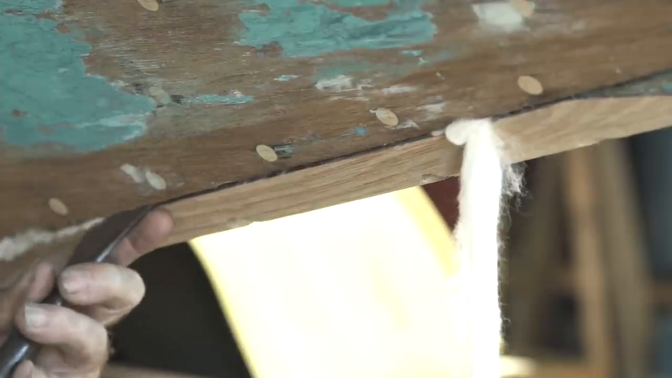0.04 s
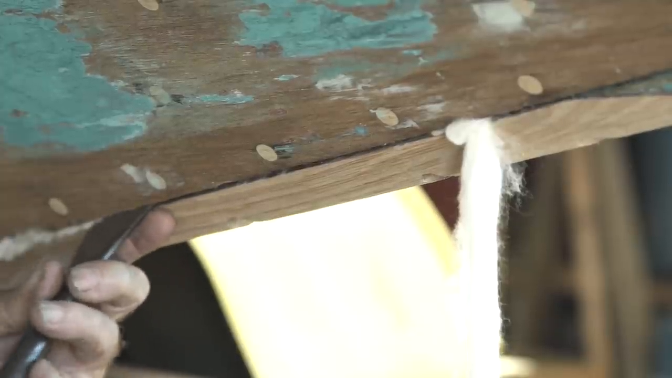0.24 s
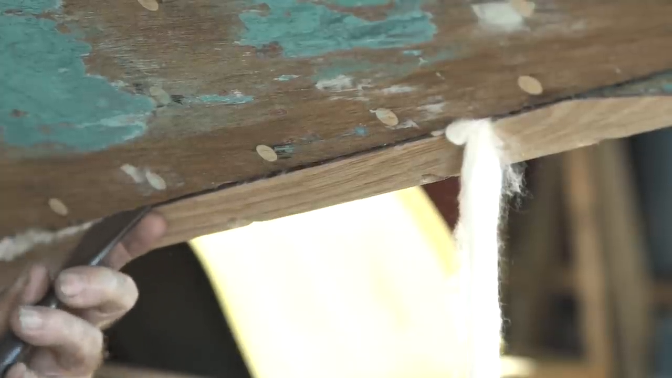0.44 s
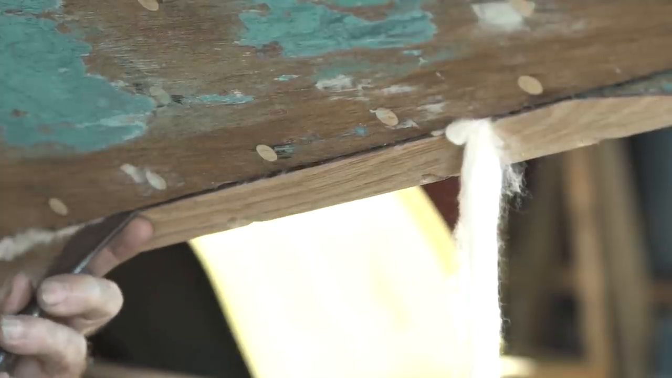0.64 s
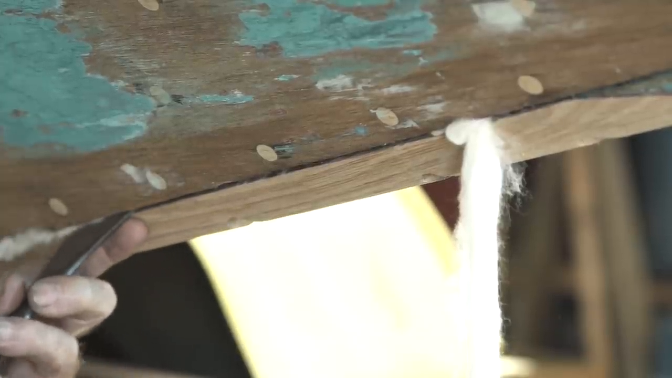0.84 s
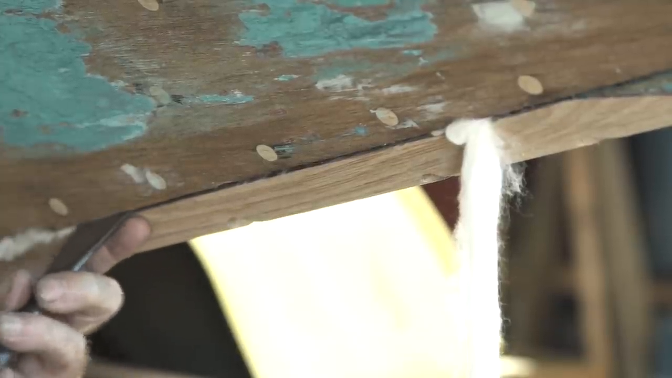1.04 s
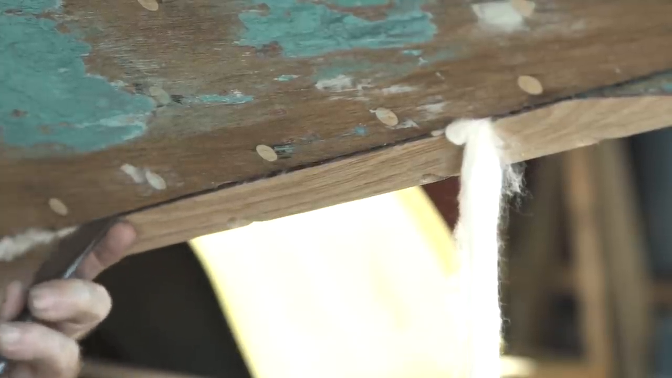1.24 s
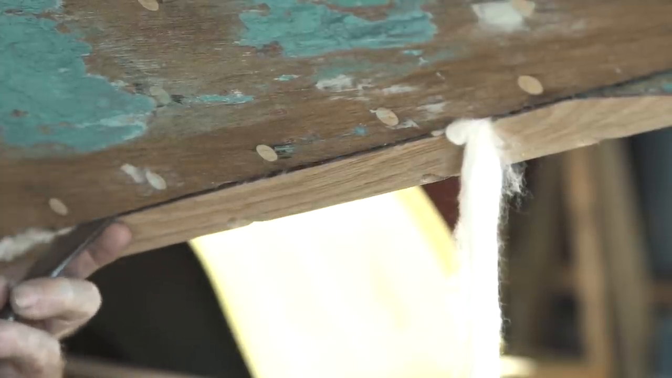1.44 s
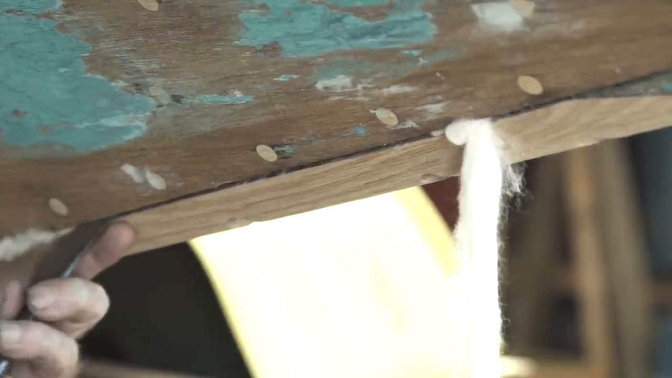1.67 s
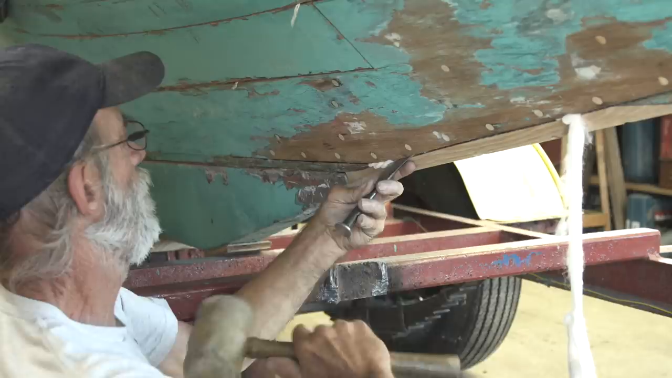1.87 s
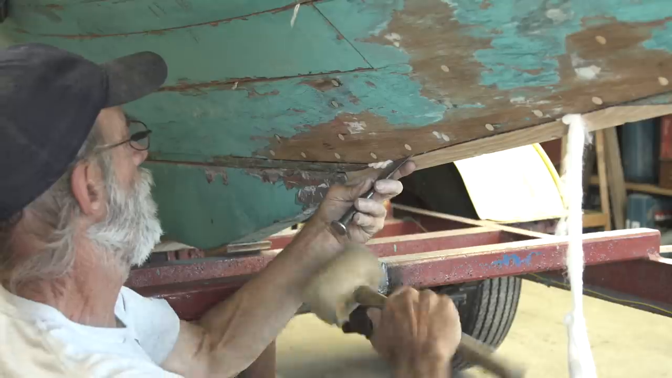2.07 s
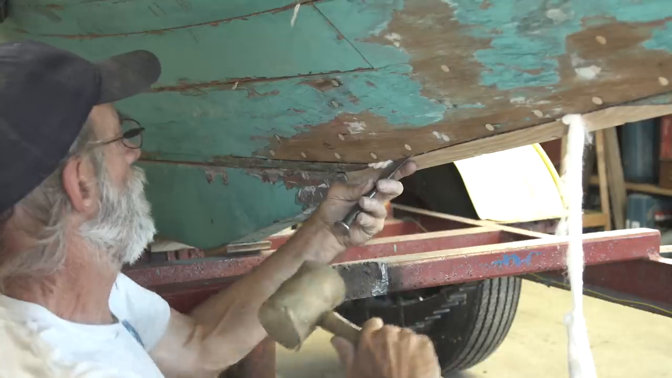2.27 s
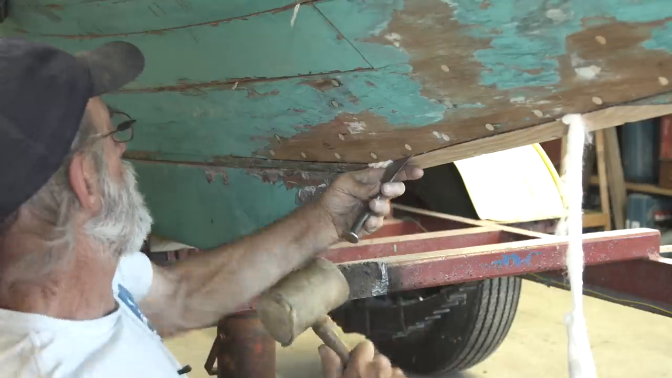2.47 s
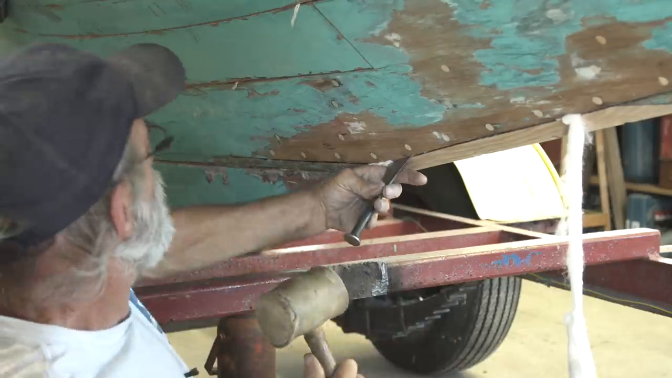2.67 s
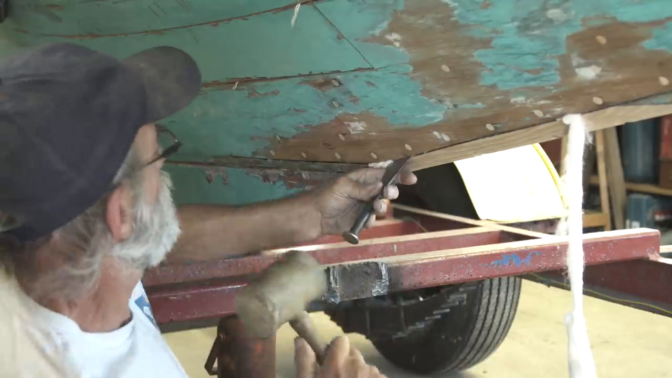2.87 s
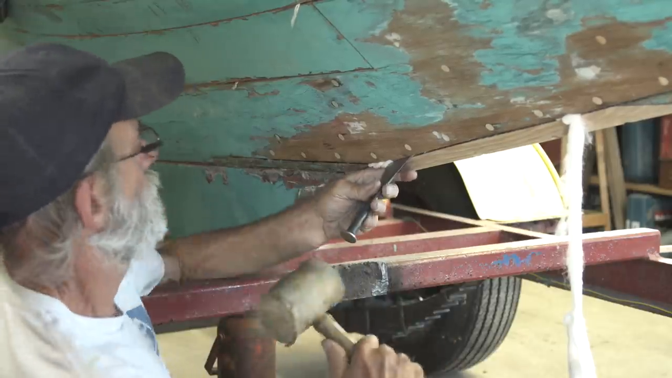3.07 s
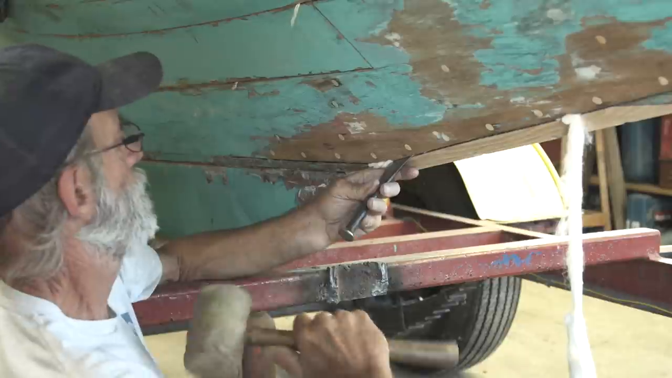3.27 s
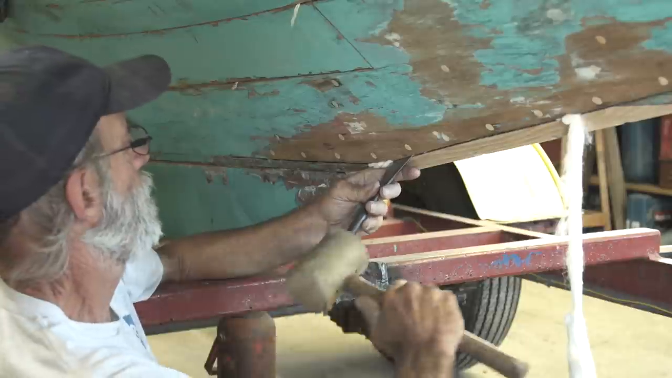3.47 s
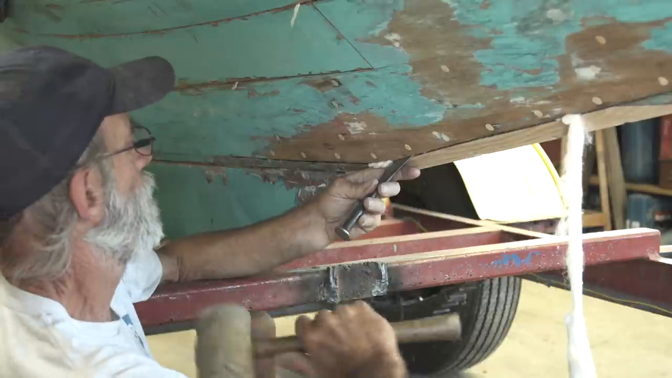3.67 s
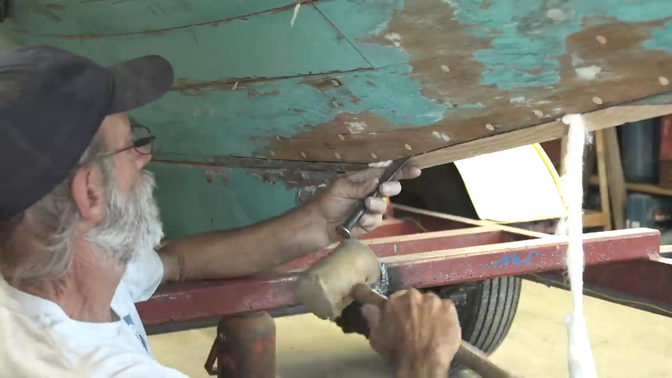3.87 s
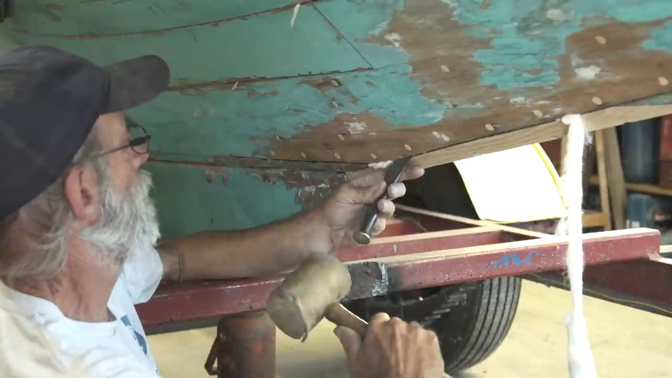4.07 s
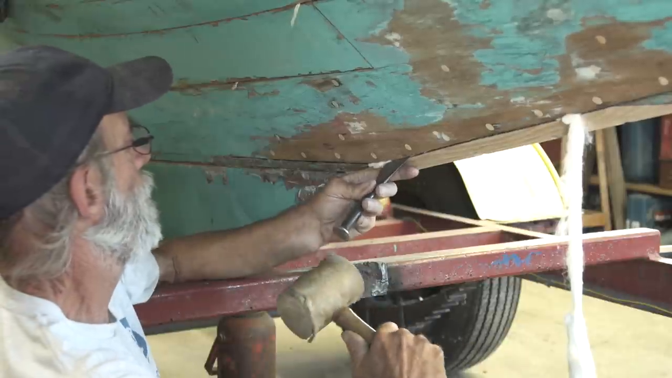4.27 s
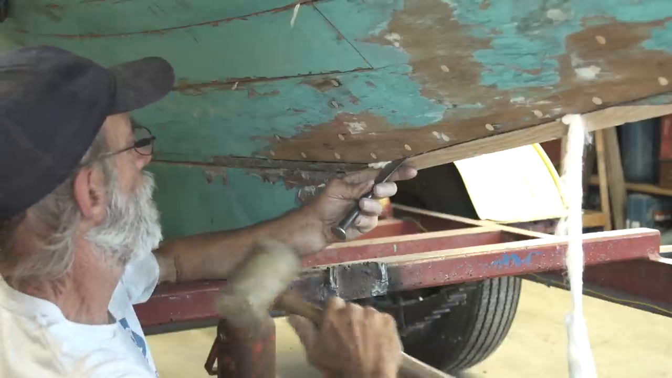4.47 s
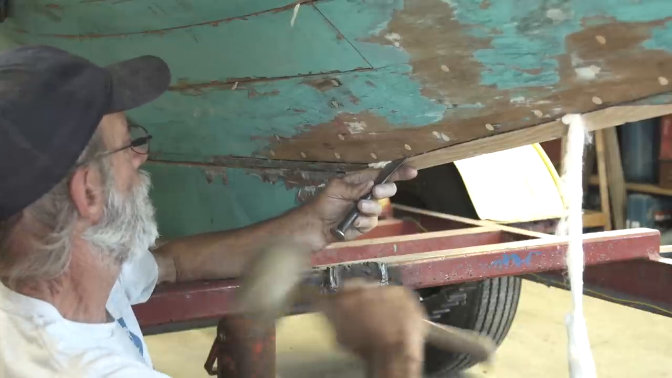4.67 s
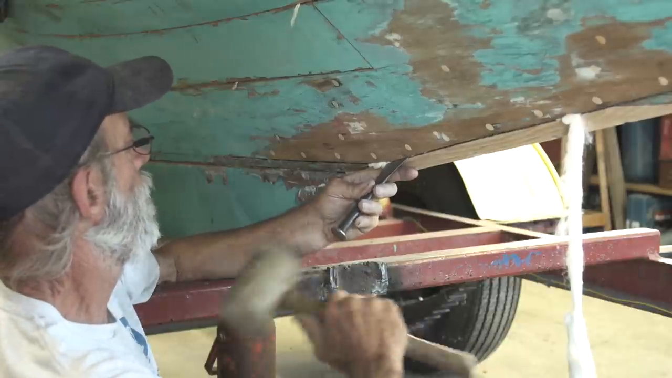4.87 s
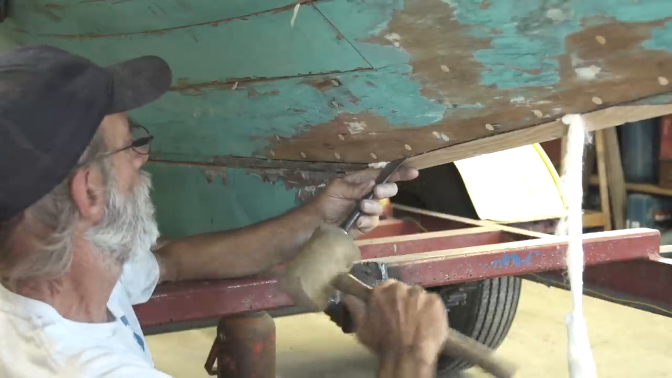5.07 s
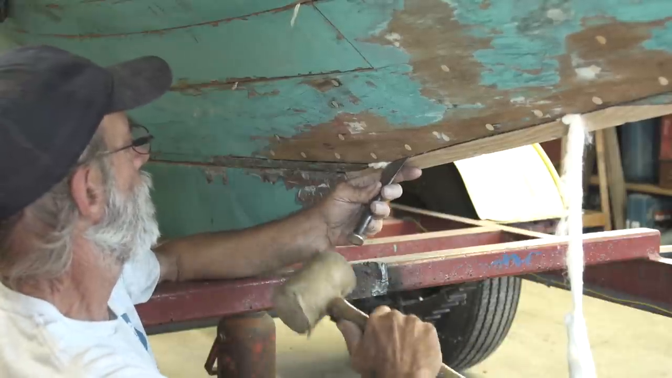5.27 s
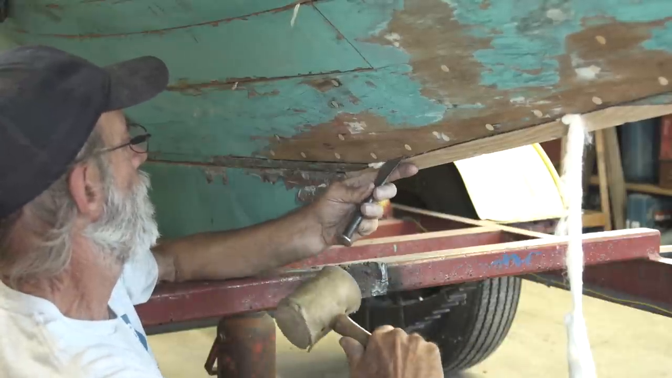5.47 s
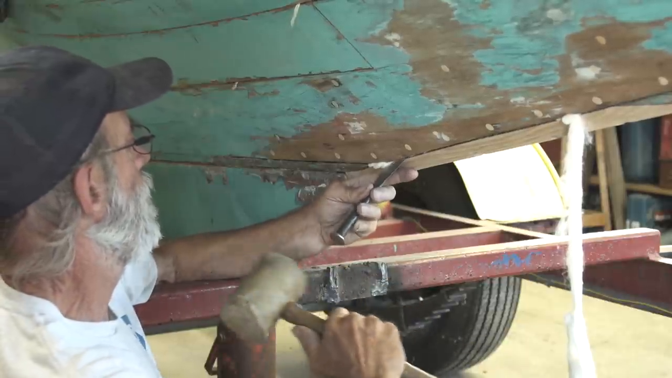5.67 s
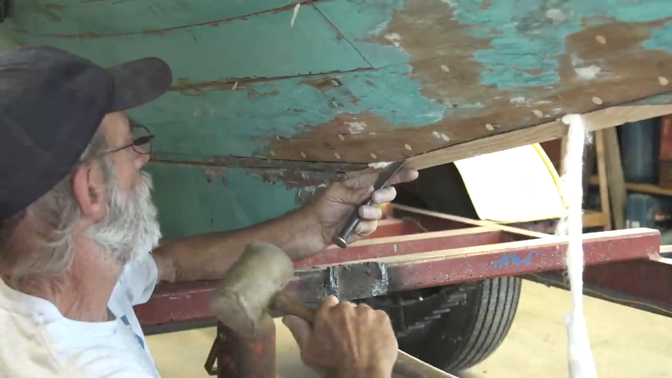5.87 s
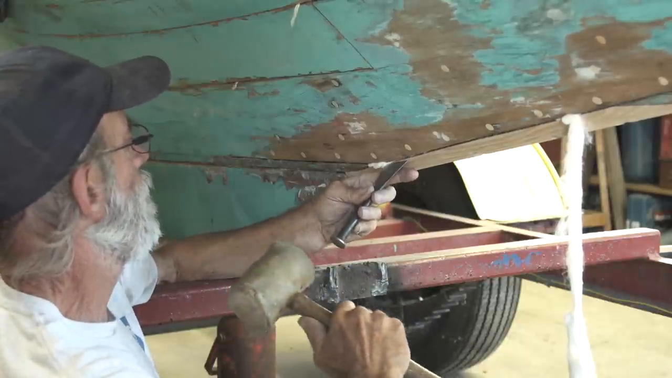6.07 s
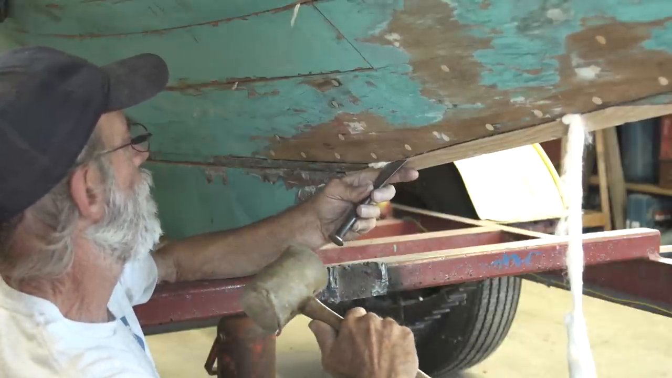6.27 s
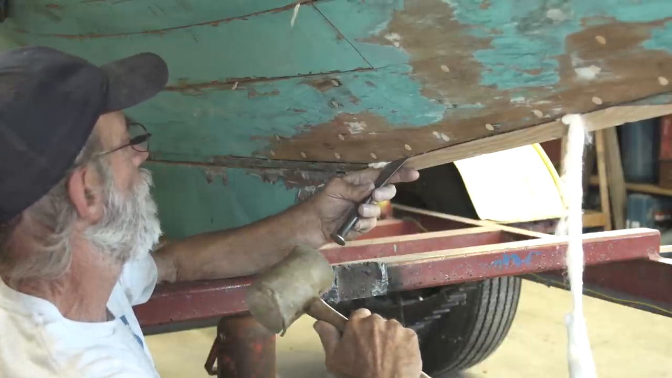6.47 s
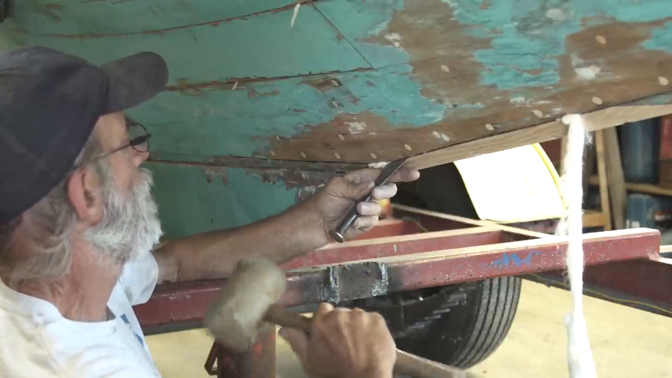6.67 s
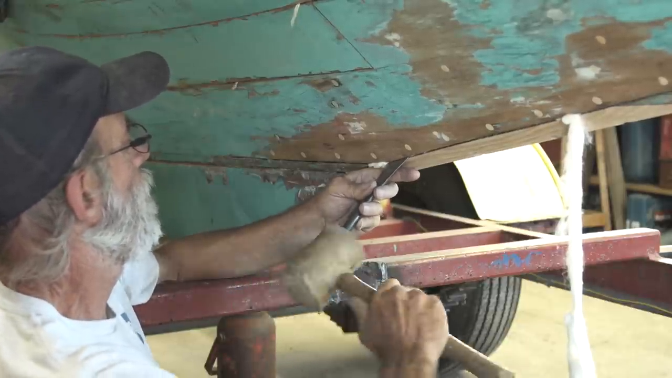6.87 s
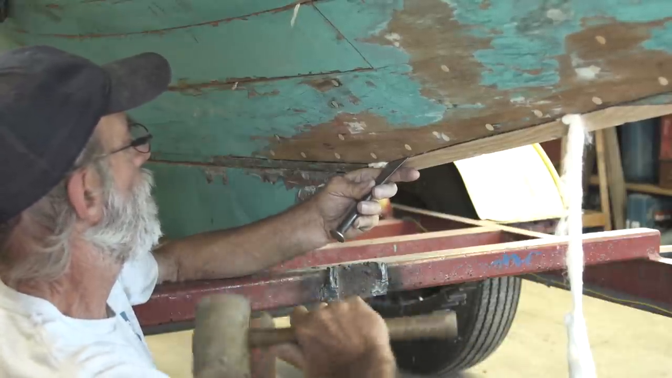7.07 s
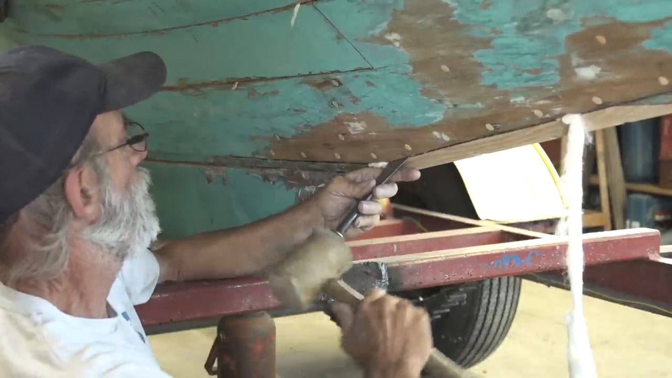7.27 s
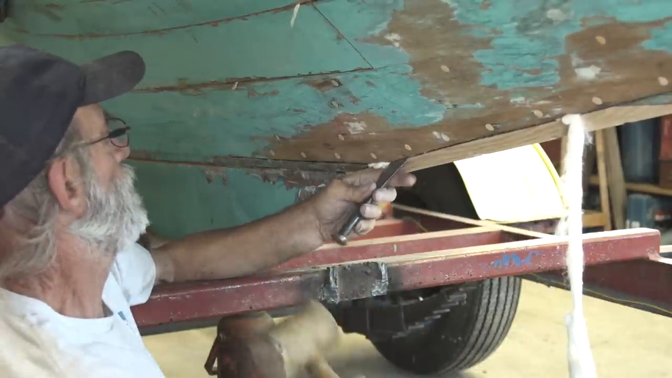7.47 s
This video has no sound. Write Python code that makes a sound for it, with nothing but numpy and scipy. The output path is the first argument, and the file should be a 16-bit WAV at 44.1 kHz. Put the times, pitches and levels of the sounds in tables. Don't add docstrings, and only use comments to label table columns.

```python
import sys
import numpy as np
from scipy import signal
from scipy.fft import rfft, irfft, next_fast_len
from scipy.io import wavfile
from scipy.ndimage import uniform_filter1d

SR = 44100
rng = np.random.default_rng(int(sys.argv[2]) if len(sys.argv) > 2 else 0)


def generate_wav(signal):
    frames = np.transpose(np.atleast_2d(signal))
    scaled = np.clip(frames, -1, 1) * 32767
    pcm = np.round(scaled).astype(np.int16)
    wavfile.write(sys.argv[1], SR, pcm)


def linear_from_db(decibels):
    return 10 ** (np.asarray(decibels, float) / 20)


N = 331191
CUT_S = 1.945

# pitch_hz, level_db, t60_s
HULL_MODES = [(61.15, -11, 0.05), (86.7, -1.5, .2), (115.3, -15, 0.51), (130.4, -4, 0.19), (180, -5, 0.33),
              (224.2, -9, 0.54), (259.7, 0, 0.21), (327, -9, 0.41)]


def evened(x):
    return x / np.sqrt(np.mean(x ** 2) + 1e-20)


def read(points, hz):
    f, value = np.transpose(points)
    return np.interp(np.log(hz + 1), np.log(f + 1), value)


def add(mix, start_s, sound):
    at = round(start_s * SR)
    sound = sound[max(-at, 0):]
    part = mix[max(at, 0):][:len(sound)]
    part += sound[:len(part)]


def noise(spectrum, size):
    hz = np.fft.rfftfreq(size, 1 / SR)
    return evened(irfft(rfft(rng.standard_normal(size)) * linear_from_db(read(spectrum, hz)), size))


def resonate(x, hz, width_hz):
    turn = np.exp(2j * np.pi * hz * np.arange(len(x)) / SR)
    r = np.exp(-np.pi * width_hz / SR)
    return 2 * (turn * signal.lfilter([1 - r], [1, -r], x / turn)).real


def ring(modes, t, rise_s, spread_db):
    total = 0
    for hz, db, t60 in modes:
        level_luck, pitch_luck = rng.uniform(-1, 1, 2)
        fall = linear_from_db(db + spread_db * level_luck - 60 * t / t60)
        total = total + fall * np.sin(2 * np.pi * hz * (1 + 0.016 * pitch_luck) * t)
    return total * (1 - np.exp(-(t / rise_s) ** 2))


def colour_of(x, size):
    power = abs(rfft(x, 4096)) ** 2
    return np.sqrt(abs(uniform_filter1d(power, size)))[::8]


def tail_colour(s, square, knock):
    # pitch_hz, level_db
    wall_crack = [(300, -22.5), (1000, 9.5), (2000, 2.5), (2700, 0.5), (3700, -5), (5100, -4), (6400, -12),
                  (10000, -14.5), (13000, -21.5), (16000, -26.5)]
    # pitch_hz, glancing_db, square_db
    seating = [(267, -14.5, 11.5), (347, -8, 7.5), (640, 4.5, -10.5), (880, 1.5, -1.5), (1250, -5.5, 1.5),
               (3070, 3, 2.5), (5300, 0.5, 0)]
    # pitch_hz, level_db
    close_seam = [(420, 0), (720, 2), (1550, 5), (2200, 4), (2850, 3), (3500, -0.5)]
    # blow_s, pitch_hz, level_db
    loose_iron = [
        (1.04, 7850, 2.5),
        (1.544, 4240, 4),
        (2.126, 5600, 0.5),
        (2.126, 9000, -3),
        (4.792, 5100, 1),
        (7.261, 7230, 9),
        (7.261, 10500, 3.5),
        (1.544, 2800, 4),
    ]
    hz = np.fft.rfftfreq(512, 1 / SR)
    colour = np.hypot(colour_of(knock, size=17), evened(linear_from_db(read(wall_crack, hz))) * linear_from_db(13.5))

    def bands(rows, width):
        return linear_from_db(sum(db * np.exp(-(np.log((hz + 1) / f) / width) ** 2) for f, db in rows))

    landing = [(f, glancing + (full - glancing) * square) for f, glancing, full in seating]
    colour *= bands(landing + (close_seam if s < CUT_S else []), 0.15)
    colour *= bands([(f, db) for at, f, db in loose_iron if round(at - s, ndigits=1) == 0], 0.09)
    treble_luck = evened(uniform_filter1d(rng.standard_normal(len(hz)), size=4))
    return colour * linear_from_db(1.7 * treble_luck * (hz > 3000))


def blow(s, strength_db, square, plank_db, mallet_db):
    # pitch_hz, level_db
    crack_colour = [(300, -26.5), (1000, -7.5), (2000, 3), (2700, 6.5), (3700, -2.5), (5100, 2),
                    (6200, -7.5), (7700, -3.5), (10000, -17.5), (13000, -29.5), (16000, -37.5)]
    # pitch_hz, level_db, t60_s
    plank_modes = [(125, -9.5, 0.14), (241, -16, 0.083), (480, -6.5, 0.1), (533, 2, 0.035),
                   (677, 6.5, 0.029), (735, -8, 0.044)]
    # pitch_hz, level_db, t60_s
    mallet_modes = [(830, -1.5, 0.043), (1100, -0.5, 0.034), (1224, -3, 0.035), (1500, -3.5, 0.021),
                    (1910, -12, 0.013), (2200, -12, 0.016), (2720, -1.5, 0.01)]
    # pitch_hz, level_db, t60_s
    thud_modes = [(116, 6, 0.077), (90, 0, 0.058)]
    t = np.arange(SR) / SR
    crack = linear_from_db(10.0) * noise(crack_colour, len(t)) * linear_from_db(-60 * t / .022)
    crack *= 1 - np.exp(-(t / 0.0019) ** 2)
    knock = linear_from_db(plank_db - 5) * ring(plank_modes, t, 0.0023, 0.47)
    knock += linear_from_db(mallet_db - 1.5) * ring(mallet_modes, t, 0.0021, 1.5)
    twin = [(1.1 * f, db - 6.5, 0.83 * t60) for f, db, t60 in HULL_MODES]
    glancing_db, square_db = -12, 15.5
    hull_db = glancing_db + (square_db - glancing_db) * square
    boom = linear_from_db(hull_db - 15.0) * ring(HULL_MODES + twin, t, 0.016, 0.93)
    boom += linear_from_db(9.5 * square) * ring(thud_modes, t, 0.018, 0.88)
    heard = shed(s, crack + linear_from_db(-3) * knock, tail_colour(s, square, knock))
    return s - .0013, linear_from_db(strength_db) * (heard + boom)


def mallet_blows(mix):
    # start_s, strength_db, squareness_0_1, plank_db, mallet_db
    earlier_blow = (-.24, -16, .2, 2, -6)
    # start_s, strength_db, squareness_0_1, plank_db, mallet_db
    blow_rows = [
        (0.23, -16.5, 0.66, 5, 0),
        (1.04, -18.5, 0.37, 4.5, -1),
        (1.544, -20.5, 0.53, 6.5, 2.5),
        (2.125, -17, 0.99, 7, 9.5),
        (3.528, -13.5, 0.83, 2.5, 6.5),
        (3.865, -13, 0.95, 5, 5),
        (4.792, -10.5, 0.4, 4, 4.5),
        (5.16, -11.5, 0.93, 2, 2.5),
        (6.938, -12.5, .45, 0, 2),
        (7.261, -11.5, 0.94, 3.5, 2),
    ]
    # start_s, level_db, modes of pitch_hz, level_db, t60_s
    iron_ring = (6.938, -48, [(11770, -3, 0.31), (7100, -6, 0.59), (5100, 2, 0.28)])
    for row in [earlier_blow, *blow_rows]:
        add(mix, *blow(*row))
    s, db, modes = iron_ring
    add(mix, s, linear_from_db(db) * ring(modes, np.arange(SR // 2) / SR, .002, 0))


def tick(s, db, hz, width_hz, t60):
    t = np.arange(8000) / SR
    edges = np.clip([hz - width_hz / 2, hz + width_hz / 2], 300, 15000)
    band = signal.butter(2, edges, "band", fs=SR, output="sos")
    puff = evened(signal.sosfilt(band, rng.standard_normal(len(t))))
    puff *= linear_from_db(db - 60 * t / t60) * (1 - np.exp(-t / 0.00076))
    return s - .001, shed(s, puff, linear_from_db(-18) * colour_of(puff, size=81), size=SR // 3)


def iron_touches(mix):
    # start_s, peak_db, centre_hz
    tick_rows = [(.692, -56.5, 7580), (.832, -77.5, 4500), (.887, -65, 7300), (.897, -67, 6900),
                 (1.782, -61.5, 8060), (2.04, -69.5, 9000), (2.316, -56, 11000), (2.338, -59, 10270),
                 (2.566, -35.5, 5070), (2.66, -59, 12000), (4.155, -64, 11000), (4.369, -42.5, 7760),
                 (4.468, -67.5, 7500), (4.593, -57.5, 3000), (4.687, -76, 7800), (4.703, -61.5, 4080),
                 (4.712, -60.5, 8620), (5.539, -49, 9000), (5.591, -46.5, 4530), (5.652, -63, 9800),
                 (5.91, -72.5, 5000)]
    # start_s, peak_db, centre_hz
    tap_rows = [
        (.691, -61, 1630),
        (.897, -68, 1500),
        (2.566, -44, 1800),
        (4.369, -41.5, 2150),
        (4.593, -58.5, 1500),
        (4.712, -65, 2200),
        (5.539, -48, 1786),
        (5.591, -40.5, 1107),
        (5.652, -61, 1750),
        (5.851, -57, 800),
    ]
    # start_s, peak_db, centre_hz
    drag_rows = [
        (4.375, -71.5, 8300),
        (4.375, -65.5, 2310),
    ]
    for rows, width, t60 in ((tick_rows, 1, 0.0096), (tap_rows, .6, .026), (drag_rows, 0.32, 0.64)):
        for s, db, hz in rows:
            add(mix, *tick(s, db, hz, width * hz, t60))


def bump(s, db, hz, t60, hull_db):
    t = np.arange(SR // 2) / SR
    modes = [(hz, 0, t60), (.62 * hz, -9, t60), (1.6 * hz, -12, t60)]
    push = linear_from_db(db + 3) * ring(modes, t, .8 / hz, 0)
    heard = shed(s, push, linear_from_db(-9) * colour_of(push, size=9), size=len(t))
    return s - .001, heard + linear_from_db(db + hull_db) * ring(HULL_MODES, t, 0.0044, 1.7)


def hull_bumps(mix):
    # start_s, peak_db, pitch_hz, t60_s, hull_answer_db
    bump_rows = [(2.566, -43, 874, 0.02, -33), (2.621, -29.5, 200, .045, -38), (2.648, -47, 103, .6, -24),
                 (3.168, -53, 58.3, 0.089, -28), (5.591, -35, 355, 0.056, -9.5),
                 (5.62, -41, 225, 0.06, -12), (5.65, -42.5, 373, 0.04, -18), (5.682, -49, 397, 0.038, -29),
                 (5.741, -50.5, 352, 0.088, -29), (5.851, -44, 370, 0.042, -8), (6.47, -65, 702, .04, -11)]
    for row in bump_rows:
        add(mix, *bump(*row))


def slide(modes, s, length_s, db):
    size = round(length_s * SR)
    grit = rng.standard_normal(size) * rng.exponential(1, size) * signal.windows.tukey(size, .4)
    grit = np.pad(grit, (0, 4000))
    sung = sum(linear_from_db(level_db) * evened(resonate(grit, f, width)) for f, width, level_db in modes)
    sung = linear_from_db(db) * evened(sung)
    return s, shed(s, sung, linear_from_db(-11.5) * colour_of(sung, size=5), size=SR // 3)


def iron_slides(mix):
    # pitch_hz, width_hz, level_db
    grip_modes = [
        [(4160, 34, 5), (7070, 140, 0.5), (7400, 63, -9.5), (7690, 35, -18), (11700, 39, -9), (13300, 40, -9)],
        [(6040, 29, -2), (7500, 60, -6), (8540, 49, -10), (9490, 60, -10), (10400, 60, -14), (12400, 66, -10)],
        [(2860, 150, -1), (4780, 60, -2.5), (7800, 61, -6.5), (8935, 40, -7), (10920, 45, -6)],
        [(1190, 33, 0)],
        [(4200, 50, 6), (9000, 93, -9)],
    ]
    # start_s, length_s, level_db
    slide_rows = [
        [(5.66, 0.082, -77.5), (5.905, 0.018, -91), (6.34, .025, -99), (6.475, 0.023, -94)],
        [(4.228, .03, -83)],
        [(2.009, .025, -88.5), (2.04, .06, -92)],
        [(0.834, 0.022, -89.5)],
        [(.612, 0.061, -90), (.752, 0.023, -97)],
    ]
    for modes, rows in zip(grip_modes, slide_rows):
        for row in rows:
            add(mix, *slide(modes, *row))


def rustle():
    # height_s, level_db, half_length_s, brightness_db_per_decade
    strokes = [(1.966, -83, 0.051, 1.5), (2.092, -82, 0.15, -6), (2.456, -66, .07, 11.5),
               (2.648, -70, 0.088, 13), (2.983, -73.5, 0.095, 5.5), (3.107, -77, .04, 13),
               (3.3, -79, 0.09, 1.5), (3.493, -81, 0.053, 5), (4.414, -71, .05, 7), (4.436, -98, 0.14, -16),
               (4.647, -83.5, 0.087, 0), (5.64, -77.5, .07, -14.5), (5.894, -90, .07, -17),
               (2.753, -93.5, .12, -16.5)]
    # pitch_hz, level_db
    cloth_colour = [(150, -45), (380, -4.5), (700, 10.5), (978, 7.5), (1390, 3.5), (2530, -1.5),
                    (10600, -15.5), (16000, -24)]
    hz, t, z = signal.stft(noise(cloth_colour, next_fast_len(N)), SR, nperseg=256)
    flicker = evened(uniform_filter1d(rng.standard_normal(len(t)), size=4))
    decades = np.log10((hz[:, None] + 1) / 5000)
    field = sum(linear_from_db(db + bright_db * decades) / np.cosh(1.1 * (t - s) / half)
                for s, db, half, bright_db in strokes)
    return signal.istft(z * field * linear_from_db(3 + 1.4 * flicker), SR, nperseg=256)[1][:N]


def air():
    # pitch_hz, level_db
    air_colour = [(15, -54.5), (25, -18.5), (80, -2), (135, -8.5), (187, -9), (410, -18), (787, -25),
                  (854, -20.5), (1120, -31), (1430, -26.5), (1640, -33.5), (2460, -34), (3810, -43),
                  (13300, -45), (16500, -70)]
    # pitch_hz, rms_db
    fan_lines = [(57.5, -75), (90.2, -66), (112, -73), (180.4, -68), (225.5, -76), (241, -78.5),
                 (300.6, -83), (963, -98), (1443, -99)]
    t = np.arange(N) / SR
    out = linear_from_db(-59.5 - 6.5) * noise(air_colour, next_fast_len(N))[:N]
    for hz, db in fan_lines:
        steady = np.sqrt(2) * np.sin(2 * np.pi * (hz * t + rng.random()))
        waver = evened(resonate(rng.standard_normal(N), hz, 2.8))
        out += linear_from_db(db) * (steady + 0.16 * waver)
    return out * shot_gain()


def shed(s, x, colour, size=SR):
    # pitch_hz, t60_s
    shed_decay = [(60, 0.6), (160, 0.76), (420, 0.59), (1100, 0.63), (2900, 0.62), (7700, 0.48),
                  (11500, .35), (15500, .3)]
    taps = np.zeros(size)
    at = np.arange(0, size - 12, 12)
    taps[at + rng.integers(0, 12, len(at))] = rng.choice([-1., 1.], len(at))
    hz, t, z = signal.stft(taps, SR, nperseg=512)
    t60 = read(shed_decay, hz)[:, None] * (0.84 if s < CUT_S else 1)
    fall = linear_from_db(-60 * t / t60) + 3.6 * linear_from_db(-60 * t / 0.054)
    tail = signal.istft(z * colour[:, None] * fall, SR, nperseg=512)[1][:size]
    tail *= linear_from_db(-18.0) * (1 - np.exp(-(np.arange(size) / SR / 0.0014) ** 2))
    add(tail, 0, x)
    return tail


def shot_gain():
    return linear_from_db(np.where(np.arange(N) < CUT_S * SR, -6, 0))


def scene():
    mix = air()
    mallet_blows(mix)
    iron_touches(mix)
    hull_bumps(mix)
    iron_slides(mix)
    return (mix + rustle())[None]


def low_pass(x):
    return signal.sosfilt(signal.butter(12, 16840, fs=SR, output="sos"), x)


def record(dry):
    ceiling = .205 * shot_gain()
    u = signal.lfilter(*signal.butter(2, 45, "high", fs=SR), dry) / ceiling
    clipped = ceiling * u / (1 + abs(u) ** 8) ** (1 / 8)
    treble_edge = signal.firwin(127, 16200, fs=SR)
    return low_pass(signal.oaconvolve(clipped, treble_edge[None], "same"))


dry = scene()
out = record(dry)
generate_wav(out)
```